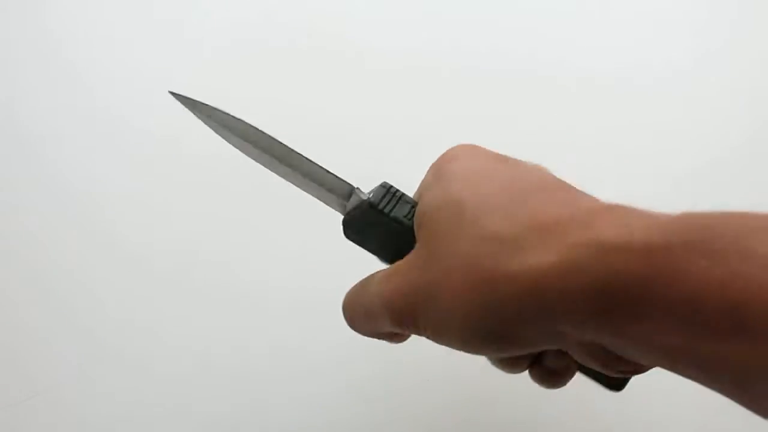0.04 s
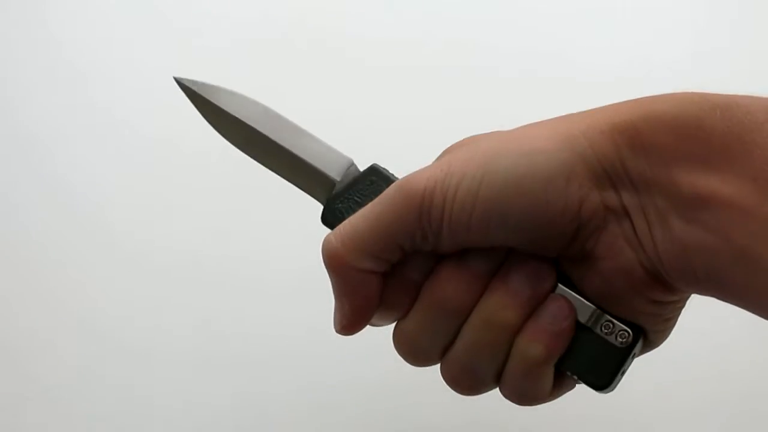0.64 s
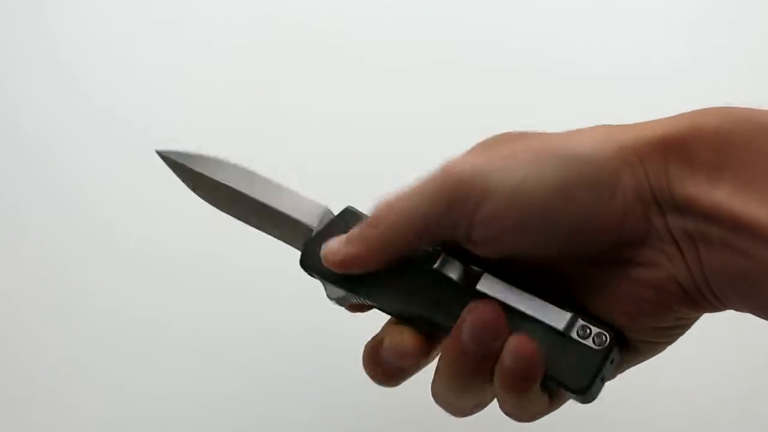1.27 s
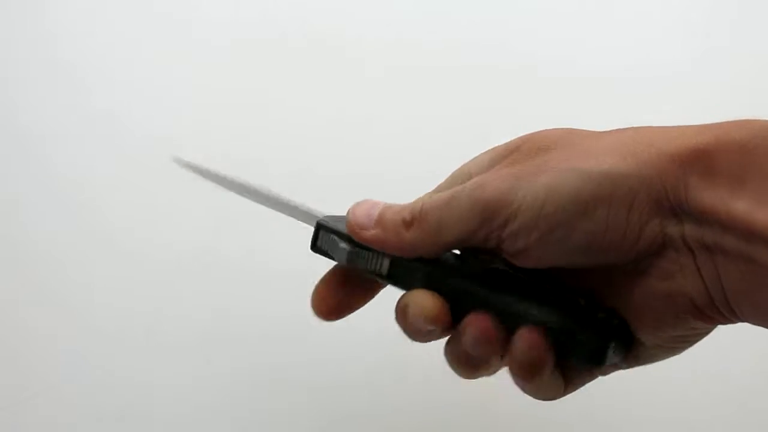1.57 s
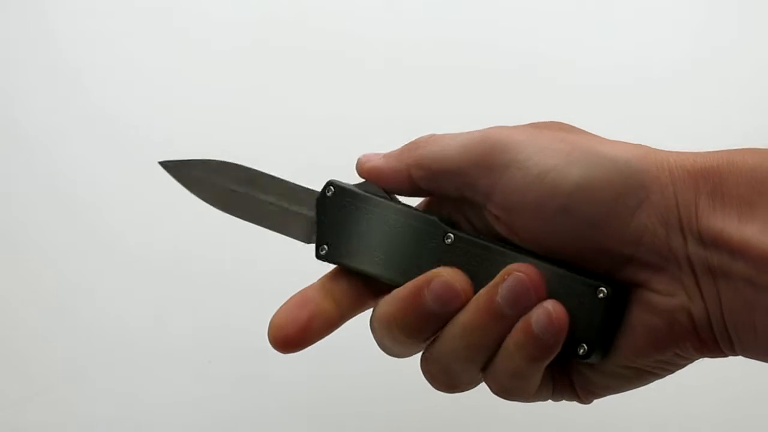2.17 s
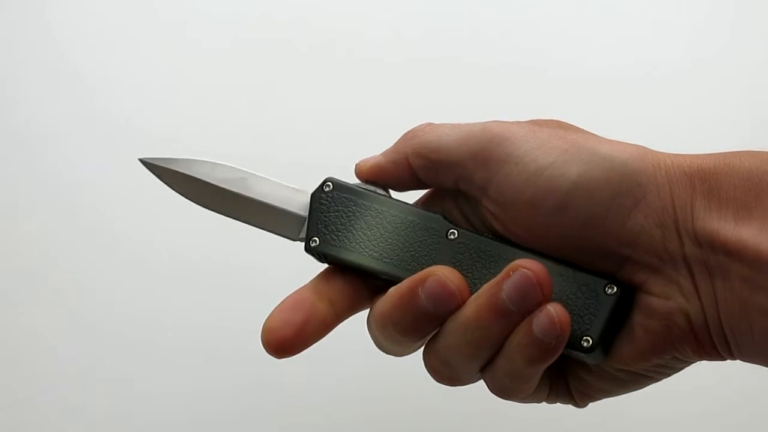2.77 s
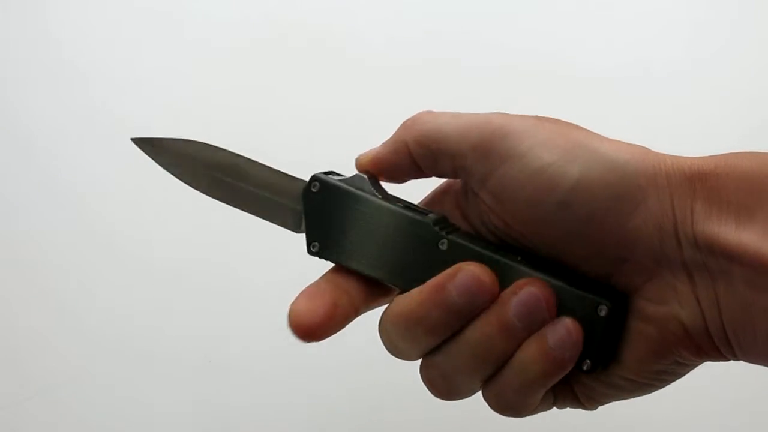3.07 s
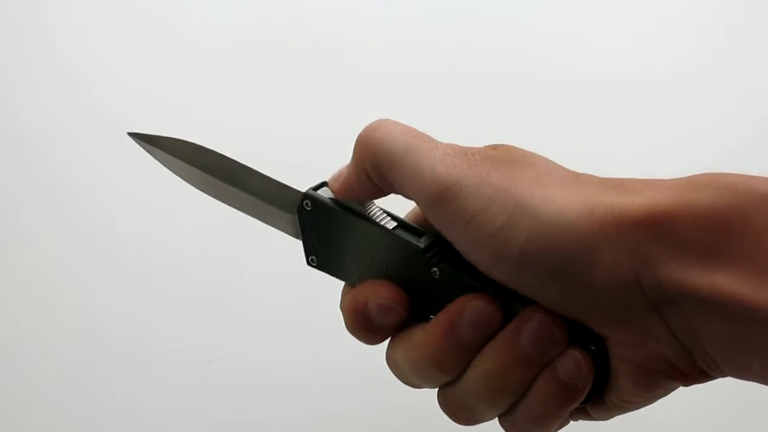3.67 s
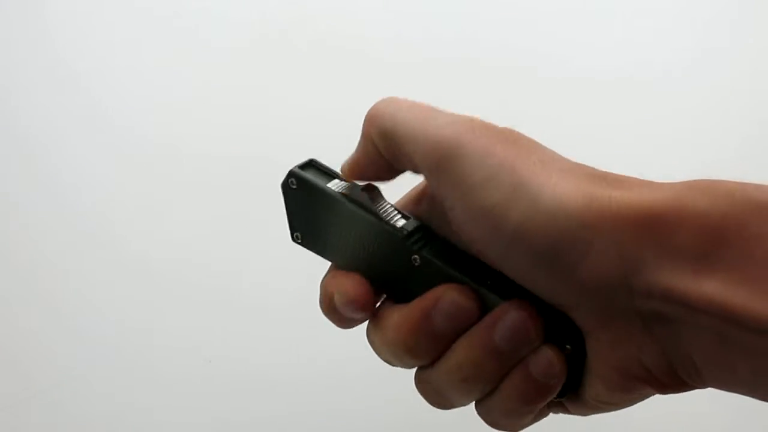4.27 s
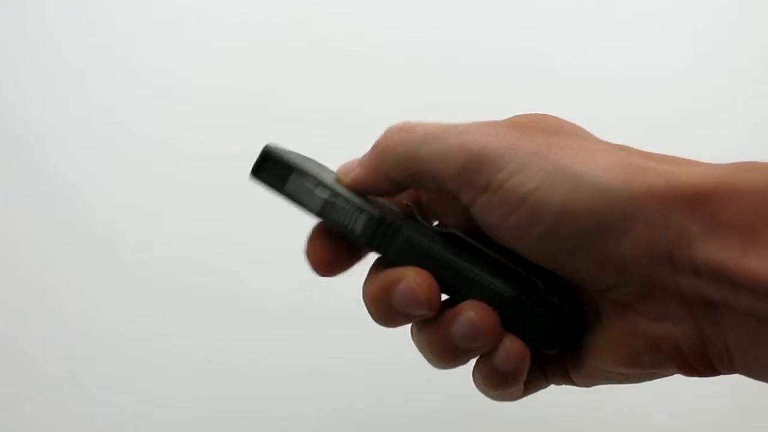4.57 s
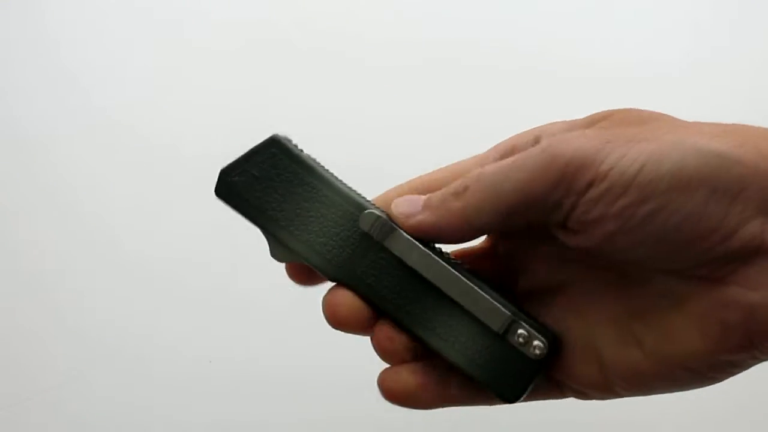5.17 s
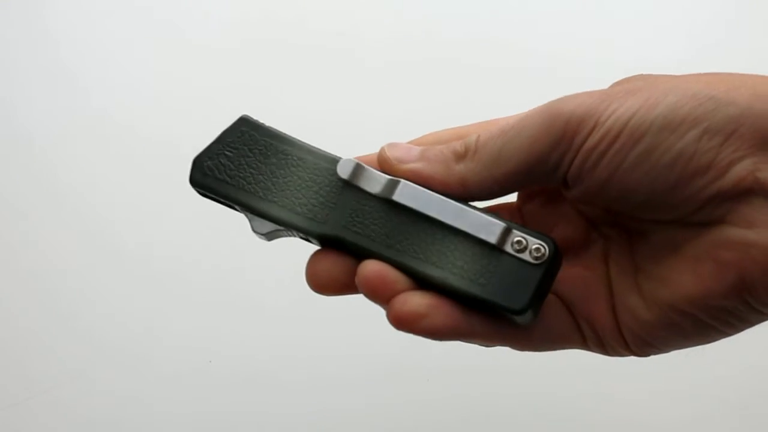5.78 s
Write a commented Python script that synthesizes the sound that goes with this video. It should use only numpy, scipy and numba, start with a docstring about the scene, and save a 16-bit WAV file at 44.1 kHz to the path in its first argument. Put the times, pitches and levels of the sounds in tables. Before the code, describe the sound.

A spring knife is turned in the hand, close to the microphone in a small quiet room. Fingers rub faintly on the handle and the loose blade taps lightly. The thumb slider gives several small clicks, then the blade retracts with one loud, sharp metallic snap that rings briefly in the room. A few soft taps and rubs follow over low hum and hiss.

```python
"""Spring knife in a quiet room

An out-the-front knife is turned in the hand, close to a camera's stereo microphone in a small room.
Fingers rub the handle, the loose blade taps, the thumb slider clicks, then the spring fires and the
blade slams home. The snap rings the room and drives the camera's gain down; the room's hum, the
microphone's hiss and a faint ticking creep back over the last two seconds."""
import sys
import numpy as np
from scipy import signal
from scipy.fft import rfft, irfft
from scipy.io import wavfile
from scipy.ndimage import uniform_filter1d, minimum_filter1d
from numba import njit

SR = 44100
rng = np.random.default_rng(int(sys.argv[2]) if len(sys.argv) > 2 else 0)


def unload_wav(signal):
    """Save mono or channel-first audio to the path in sys.argv[1] as 16-bit WAV at rate SR, clipped to [-1, 1]."""
    wavfile.write(
        sys.argv[1],
        SR,
        np.round(np.clip(np.atleast_2d(signal).T, -1, 1) * 32767).astype(np.int16),
    )


N = 265482
T = np.arange(N) / SR
LEVEL_SPAN_S = .005  # a blow's level is its energy spread over this span, before room and gain control
REBOUND_S = .0034  # sprung parts land again this much later


def snap(decay_note_db=-10):
    """The catch gives way, the spring fires and the blade slams home; every blow rebounds."""
    # The catch slips, the catch lets go, the spring throws the blade back, the blade hits its rear stop.
    # Each row: start in seconds, level in dB, contact decay in seconds, low cut in Hz, body in dB,
    # top edge in dB, the part's note in Hz, its share in dB, the handle's share of the blow in dB.
    blows = [(3.9515, -12, .004, 895, 9.5, -5, 8800, -13.5, -14.5),
             (3.956, 1.5, 0.0028, 798, 7, -5.5, 9160, 0, -2),
             (3.9581, 7.5, .001, 298.8, -3.5, 3, 7140, -4.5, -22.5),
             (3.9830, 6, .0015, 608.3, 4, -2.5, 3410, -9, -6)]
    out = np.zeros((2, N))
    for start, db, *touch, note_hz, note_db, knock_db in blows:
        add(out, start, strike(db, *touch, note_hz, note_db, note_t60=.007))
        add(out, start + REBOUND_S, rebound(db - 10, *touch))
        add(out, start, handle_knock(db + knock_db, cut_hz=0))
    return out


def blade_slide(start_s=3.964, length_s=.017, db=-9, grit_db=4):
    """The flying blade scrapes along its track between catch and stop."""
    count = int(length_s * SR)
    mid, side, grit = rng.standard_normal((3, SR))[:, :count]
    friction = stereo(mid, side / 2) * undb(grit_db * grit)
    spectrum = [(500, -24.5), (2500, -11), (6000, -8), (8700, 3.5), (12500, -5.5), (15500, -13.5)]
    out = np.zeros((2, N))
    add(out, start_s, in_room(undb(db) * unit(colour(friction, spectrum))))
    return out


def slider(decay_s=.0011, rebound_db=-11, knock_db=2):
    """The slider clicks against its stops under the thumb, rebounds and knocks the handle."""
    # The slider's clicks. Each row: start in seconds, level in dB, low cut in Hz, body in dB,
    # top edge in dB, the slider's note in Hz.
    clicks = [(2.9632, -29.5, 1620, -5, -10.5, 8480), (3.0514, -35, 1720, 0.5, -7, 5530),
              (3.2316, -28.5, 3230, -5, -6, 6000), (3.5350, -40.5, 1818, 14.5, -6, 6960),
              (3.6009, -31.5, 2930, -1, -0.5, 11400), (3.6186, -31.5, 3300, -2, 0, 6070),
              (3.8075, -31.5, 4980, -13.5, 2.5, 7000)]
    out = np.zeros((2, N))
    for start, db, cut_hz, body_db, edge_db, note_hz in clicks:
        touch = decay_s, cut_hz, body_db, edge_db
        add(out, start, strike(db, *touch, note_hz, note_db=-5.5, note_t60=.008))
        add(out, start + REBOUND_S, rebound(db + rebound_db, *touch))
        add(out, start, handle_knock(db + knock_db, cut_hz))
    return out


def blade_taps(note_hz=3300, edge_db=-5.5, knock_db=-8):
    """The blade has a little play and taps its track, ringing, as the grip shifts."""
    # The loose blade's taps. Each row: start in seconds, level in dB, low cut in Hz, body in dB.
    taps = [(0.9893, -47.5, 2410, 23), (0.9970, -51, 890, 11), (1.0420, -49, 1500, 2),
            (1.1240, -51, 900, 11), (1.1366, -38, 600, 3), (1.3865, -52, 1200, 13), (1.7220, -46, 1800, 9),
            (4.2904, -30, 10500, -8), (4.6203, -39.5, 3290, 9), (4.8020, -49, 3000, 8),
            (4.8262, -46.5, 3000, 11)]
    out = np.zeros((2, N))
    for start, db, cut_hz, body_db in taps:
        decay_s = .0022 * 2 ** ((db + 50) / 30)  # a tap 30 dB firmer rubs twice as long
        note_db = -14 - 60 * np.log10(max(1, cut_hz / note_hz))  # thin taps miss the blade's note
        add(out, start, strike(db, decay_s, cut_hz, body_db, edge_db, note_hz, note_db, note_t60=.059))
        add(out, start, handle_knock(db + knock_db, cut_hz))
    return out


def strike(db, decay_s, cut_hz, body_db, edge_db, note_hz, note_db, note_t60):
    """One contact with the struck part's note; only the clack carries into the room."""
    clack = contact(decay_s, cut_hz, body_db, edge_db)
    note = undb(note_db) * stereo(part_note(note_hz, note_t60), 0)
    out = in_room(clack)
    add(out, 0, note)
    energy = np.mean(np.sum((clack + note) ** 2, axis=1))
    return out * undb(db) * np.sqrt(LEVEL_SPAN_S * SR / energy)


def rebound(db, decay_s, cut_hz, body_db, edge_db):
    """The part lands a second time, with less body and more edge."""
    clack = contact(decay_s, cut_hz, body_db - 7, edge_db + 1.5)
    return in_room(clack) * undb(db) * np.sqrt(LEVEL_SPAN_S * SR / clack.shape[1])


def contact(decay_s, cut_hz, body_db, edge_db, ring_db=-6, side_db=-9, shake_db=-22, shake_s=.026):
    """Steel meets steel: a gritty crack, a short shake of loose parts and the knife's modes."""
    # The dry crack's spectrum. Each row: frequency in Hz, relative level in dB.
    crack_spectrum = [(100, -22), (400, -22.5), (750, -14.5), (1900, -7.5), (2700, -7.5), (3500, -3.5),
                      (4800, -1.5), (7000, 0.5), (9000, 1.5), (11000, 3), (13500, 0.5), (15500, -14)]
    # Modes of blade, spring and slider. Each row: frequency in Hz, relative level in dB, t60 in seconds.
    knife_modes = [(2297, -6.5, .03), (3340, -7, .03), (3617, -6.5, .05), (3937, -7, 0.024),
                   (4440, -9.5, 0.048), (4650, -10, 0.044), (5630, -4.5, 0.065), (6200, -6.5, 0.074),
                   (6770, -11, 0.052), (6730, 0.5, 0.023), (7380, -2, .04), (7440, -2, 0.023),
                   (7300, -13.5, .04), (8760, -6, .03), (8725, -6.5, .04), (8540, 4, 0.026),
                   (9900, -1, 0.02), (9860, 1.5, 0.038), (10130, -6, .05), (11780, -5, 0.04),
                   (11825, -5.5, 0.025), (12110, -7, 0.069), (13110, -0.5, 0.034), (13310, 1, 0.02),
                   (13480, 0, .025), (15300, -3, .02)]
    t = T[:SR // 10]
    mid, side = rng.standard_normal((2, len(t)))
    envelope = np.exp(-t / decay_s) + undb(shake_db) * np.exp(-t / shake_s)
    crack = colour(stereo(mid, undb(side_db) * side) * envelope, crack_spectrum)
    hz, db, t60 = np.transpose(knife_modes)[:, :, None]
    # every mode radiates its own way; short waves reach the two ports further out of phase
    mid_phase = rng.uniform(0, 2 * np.pi, hz.shape)
    phase = stereo(mid_phase, .18 * hz / hz.mean() * rng.standard_normal(hz.shape))
    build = 1 - np.exp(-4 * t / decay_s)  # the ring grows while the parts touch
    ring = build * (undb(db - 60 * t / t60) * np.sin(2 * np.pi * hz * t + phase)).sum(axis=1)
    # heavy blows move the handle as well; small parts radiate no lows
    tone = [(1600, body_db), (3400, body_db / 2), (6000, .002), (8800, .0077), (11500, edge_db)]
    clack = colour(unit(crack) + undb(ring_db) * unit(ring), tone)
    low_cut = signal.butter(3, cut_hz, "high", fs=SR, output="sos")
    return unit(signal.sosfilt(low_cut, clack))


def part_note(hz, t60, rise_s=.0005):
    """The struck part's own short note, a damped sine."""
    t = T[:SR // 10]
    envelope = (1 - np.exp(-t / rise_s)) * undb(-60 * t / t60)
    return unit(envelope * np.sin(2 * np.pi * hz * t))


def handle_knock(blow_db, cut_hz, coupling_db=-16):
    """A blow shoves the hollow handle, which rings briefly in the fist."""
    # The handle's modes. Each row: frequency in Hz, relative level in dB, t60 in seconds.
    handle_modes = [(697.6, -2.5, 0.014), (870, -0.5, 0.013), (1030, 2.5, 0.013), (1200, 3, 0.026),
                    (1540, -4, 0.011), (1810, 2, 0.02), (2060, 6, 0.035), (2180, 2.5, 0.0095)]
    t = T[:SR // 10]
    hz, db, t60 = np.transpose(handle_modes)[:, :, None]
    phase = rng.uniform(0, 2 * np.pi, hz.shape)
    reach = 1 / np.hypot(1, (cut_hz / hz) ** 4)  # small parts miss the low modes
    ring = (reach * undb(db - 60 * t / t60) * np.sin(2 * np.pi * hz * t + phase)).sum(axis=0)
    ring *= 1 - np.exp(-t * hz.mean())  # the shell takes about a cycle to get going
    return in_room(undb(coupling_db + blow_db) * stereo(ring, 0))


def fingers(grit_db=5, slip_db=3, blade_hz=3505):
    """Skin sticks and slips on the textured handle and sets the blade singing."""
    # Finger strokes. Each row: start and length in seconds, skin hiss in dB, blade singing in dB.
    rubs = [(0.985, 0.064, -54, -62), (1.067, 0.2, -57.5, -87), (1.242, 0.23, -58.5, -59),
            (2.07, 0.19, -59, -80), (2.217, 0.033, -65, -55.5), (4.761, 0.054, -60, -60),
            (5.032, 0.11, -62, -80.5)]
    skin_spectrum = [(300, -2), (1200, -2.5), (4000, -5.5), (9000, -4), (15000, -9.5)]
    mid, side, grit = rng.standard_normal((3, N))
    friction = stereo(mid, side / 2) * undb(grit_db * grit)
    slips = undb(slip_db * unit(uniform_filter1d(rng.standard_normal(N), SR // 150)))
    skin = unit(slips * colour(friction, skin_spectrum))
    blade = unit(slips * resonance(blade_hz, width_hz=210))
    out = np.zeros((2, N))
    for start, length_s, hiss_db, sing_db in rubs:
        stroke = np.sqrt(np.hanning(int(length_s * SR)))
        span = slice(int(start * SR), int(start * SR) + len(stroke))
        add(out, start, stroke * (undb(hiss_db) * skin[:, span] + undb(sing_db) * blade[span]))
    return out


def in_room(x, wet_db=-7, build_s=.002, side_db=-3):
    """A short sound in the small room: near walls answer within milliseconds; the treble dies first."""
    # The reverberation. Each row: frequency in Hz, relative level in dB, t60 in seconds.
    room_bands = [(200, 1, 1), (440, 11, .7), (901, 0, .65), (1900, -6, 0.66), (4050, 1, 0.56),
                  (7400, -1, 0.49), (9900, 1, .34), (15000, 0.5, 0.26)]
    t = T[:SR * 2 // 3]
    mid, side = rng.standard_normal((2, len(t)))
    hz, age, cells = signal.stft(stereo(mid, undb(side_db) * side), SR, nperseg=256)
    db, t60 = (log_curve(hz, np.array(room_bands)[:, [0, k]])[:, None] for k in (1, 2))
    tail = signal.istft(cells * undb(db - 60 * age / t60), SR)[1][:, :len(t)]
    tail *= 1 - np.exp(-(t / build_s) ** 2)
    response = unit(tail) / np.sqrt(len(t))
    out = undb(wet_db) * signal.fftconvolve(x.mean(axis=0)[None], response, axes=1)
    out[:, :x.shape[1]] += x
    return out


def ports(x):
    """The microphone's two ports colour the close sound a little differently."""
    # The ports' balance. Each row: frequency in Hz, left minus right in dB.
    balance = [(500, -0.5), (1300, -1.5), (2400, -1.5), (5000, 0), (8000, -3), (13000, 2)]
    half_db = log_curve(np.fft.rfftfreq(N, 1 / SR), balance) / 2
    return irfft(rfft(x) * undb(stereo(0, half_db)), N)


def room_tone(air_db=-53.5, hum_hz=119.9):
    """Room air with a wavering drone and a low hum, alike in both channels."""
    # The air's spectrum. Each row: frequency in Hz, relative level in dB.
    air_spectrum = [(25, -21), (60, -9.5), (100, -6.5), (160, 2.5), (260, -4), (420, -6), (700, -9.5),
                    (1500, -14), (3000, -20.5), (8000, -24.5), (12000, -29), (15500, -31.5)]
    # The room's droning resonances. Each row: frequency in Hz, width in Hz, level in dB.
    drone_modes = [(42, 7, -69), (198.7, 18, -60.5), (299, 16, -68.5), (350, 45, -66)]
    # The hum's rise and fall. Each row: time in seconds, level in dB.
    hum_levels = [(0.25, -69), (0.45, -55.5), (1.6, -57.5), (2.3, -67.5), (2.8, -51.5), (3.1, -63.5),
                  (4.5, -55.5), (6.0, -63)]
    air = undb(air_db) * unit(colour(rng.standard_normal(N), air_spectrum)[0])
    drone = sum(undb(db) * resonance(hz, width_hz) for hz, width_hz, db in drone_modes)
    hum = undb(np.interp(T, *np.transpose(hum_levels))) * resonance(hum_hz, width_hz=12)
    return stereo(air + drone + hum, 0)


def microphone_hiss(db=-43.5):
    """The microphone's own noise, opposed in the two channels."""
    # The noise's spectrum. Each row: frequency in Hz, relative level in dB.
    spectrum = [(15, -45.5), (25, -15.5), (101, -0.5), (359, -2), (410, -4.5), (509, -5.5), (895, -11),
                (1050, -12), (1620, -18.5), (1750, -18.5), (3340, -34), (4870, -32), (5730, -34.5),
                (14300, -40.5), (15500, -40.5)]
    return stereo(0, undb(db) * unit(colour(rng.standard_normal(N), spectrum)[0]))


def camera_ticks(rate_hz=15, decay_s=.003, fade_db_per_s=-1.06):
    """A faint double tick in the camera, each a little different in size, slowly fading."""
    # The two ticks. Each row: offset in the cycle in seconds, typical level before the fade in dB.
    tick_pair = [(0.0277, -51), (0.0428, -50.5)]
    # The ticks' spectrum. Each row: frequency in Hz, relative level in dB.
    spectrum = [(300, -17.5), (1000, -4.5), (2200, 1.5), (3200, -10), (4400, -1), (6000, -17), (15000, -31)]
    envelope = np.zeros(N)
    for offset_s, db in tick_pair:
        cycle, age = np.divmod(T - offset_s, 1 / rate_hz)
        size_db = db + rng.standard_normal(N)[cycle.astype(int)]
        envelope += undb(size_db) * np.exp(-age / decay_s)
    return envelope * undb(fade_db_per_s * T) * unit(colour(rng.standard_normal(N), spectrum))


def gain_control(x, ceiling_db=-10, hold_s=.23, release_s=2.75):
    """The camera watches the short-term level a moment ahead and turns itself down."""
    window = SR // 200
    power = uniform_filter1d(np.mean(x ** 2, axis=0), window)
    level = np.sqrt(np.abs(power) + 1e-12)
    allowed = minimum_filter1d(undb(ceiling_db) / level, 3 * window)
    gain = recover(allowed, hold_s * SR, 1 / (release_s * SR))
    return x * uniform_filter1d(gain, window // 2)


@njit
def recover(allowed, hold, rate):
    """Gain falls at once to what is allowed, waits, then creeps back toward 1."""
    gain, g, wait = np.empty(len(allowed)), 1., 0.
    for i in range(len(allowed)):
        wait -= 1
        if allowed[i] < g:
            g, wait = allowed[i], hold
        elif wait < 0:
            g += (1 - g) * rate
        gain[i] = g
    return gain


def colour(x, points, size=2048):
    """Causal filter with the given (Hz, dB) response, built from its cepstrum."""
    gain = undb(log_curve(np.fft.rfftfreq(size, 1 / SR), points))
    cepstrum = irfft(np.log(gain))
    cepstrum[1:size // 2] *= 2
    cepstrum[size // 2 + 1:] = 0
    response = irfft(np.exp(rfft(cepstrum)))
    return signal.fftconvolve(np.atleast_2d(x), response[None], axes=1)[:, :x.shape[-1]]


def resonance(hz, width_hz):
    """Noise ringing in one steep resonance."""
    b, a = signal.iirpeak(hz, hz / width_hz, fs=SR)
    return unit(signal.lfilter(b, a, signal.lfilter(b, a, rng.standard_normal(N))))


def log_curve(hz, points):
    """Join (Hz, value) points on a log-frequency axis."""
    at, value = np.transpose(points)
    return np.interp(np.log(hz + 1), np.log(at), value)


def undb(db):
    """Decibels to gain."""
    return 10 ** (np.asarray(db) / 20)


def unit(x):
    """Scale to rms 1."""
    return x / np.sqrt(np.mean(x ** 2))


def stereo(mid, side):
    """Left and right from mid and side."""
    return np.array([mid + side, mid - side])


def add(out, start_s, x):
    """Mix x into out from start_s on."""
    i = int(start_s * SR)
    out[:, i:i + x.shape[1]] += x[:, :N - i]


def scene():
    """Knife and hand close to the microphone, over room tone and the camera's own noises."""
    knife = blade_taps() + slider() + snap() + blade_slide() + fingers()
    return ports(knife) + room_tone() + microphone_hiss() + camera_ticks()


def record(dry):
    """The camera's gain control, full-scale clipping and a steep top cut at 15850 Hz."""
    top_cut = signal.ellip(10, .2, 70, 15850, fs=SR, output="sos")
    return signal.sosfilt(top_cut, np.clip(gain_control(dry), -1, 1))


dry = scene()
out = record(dry)
unload_wav(out)
```